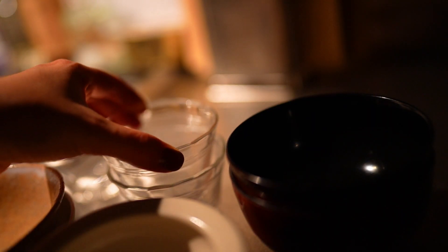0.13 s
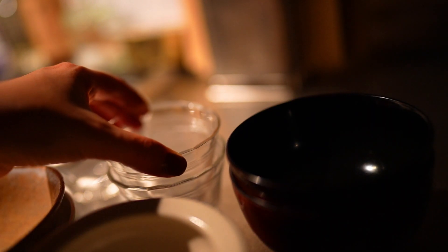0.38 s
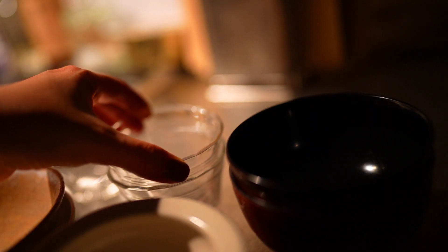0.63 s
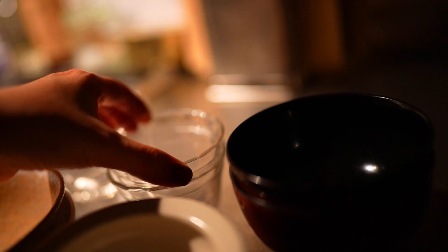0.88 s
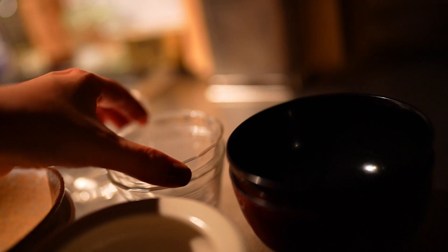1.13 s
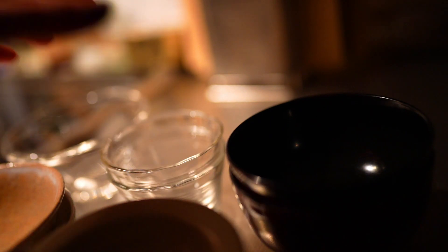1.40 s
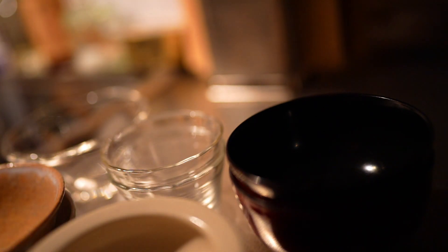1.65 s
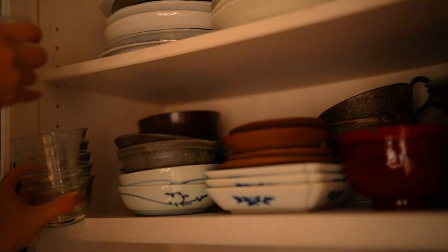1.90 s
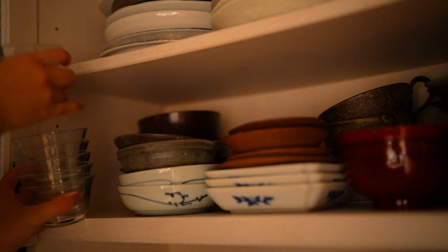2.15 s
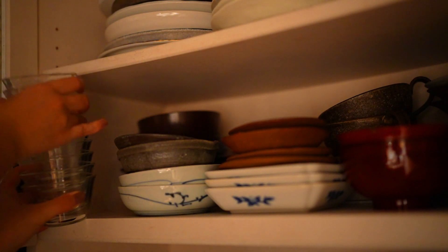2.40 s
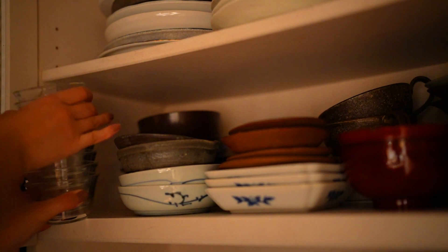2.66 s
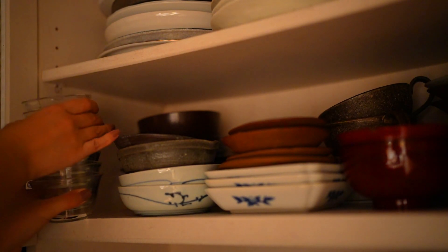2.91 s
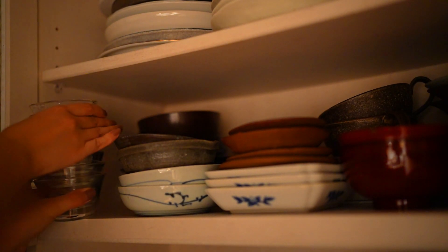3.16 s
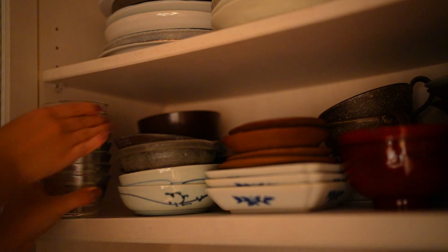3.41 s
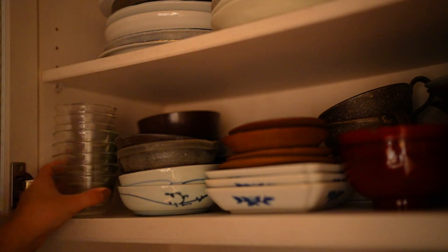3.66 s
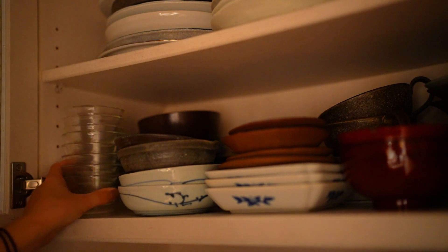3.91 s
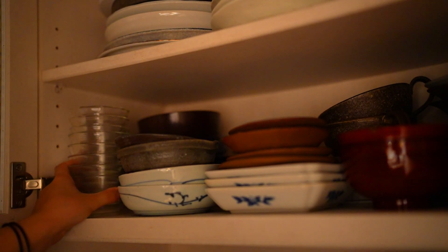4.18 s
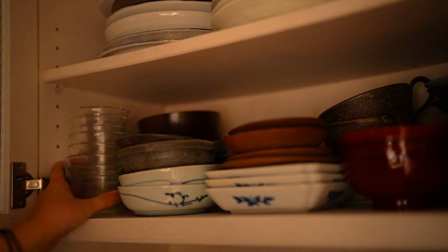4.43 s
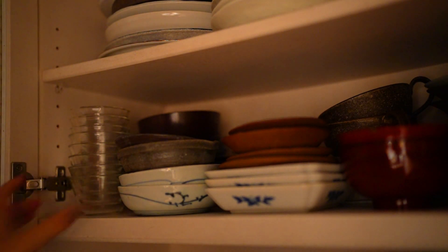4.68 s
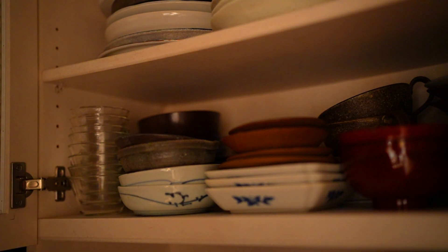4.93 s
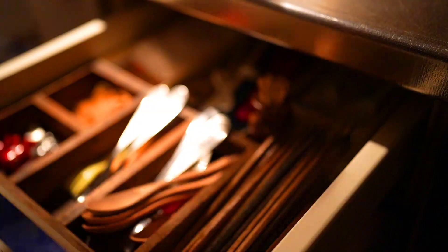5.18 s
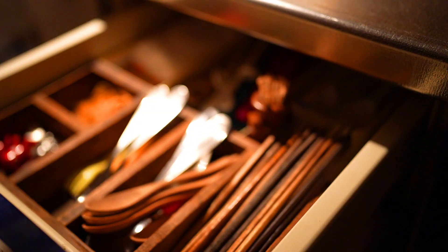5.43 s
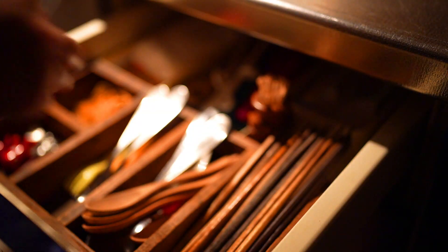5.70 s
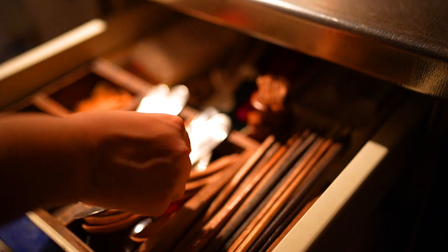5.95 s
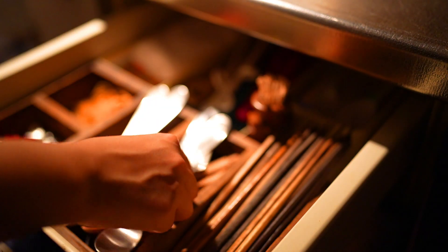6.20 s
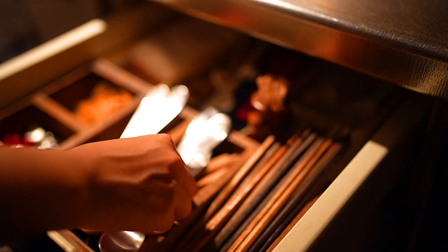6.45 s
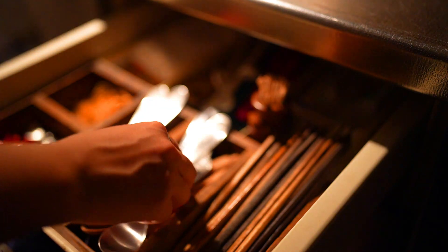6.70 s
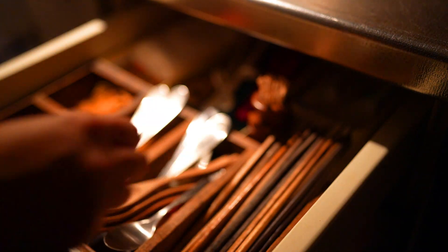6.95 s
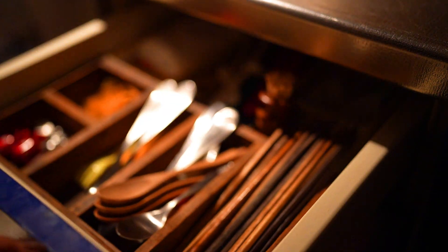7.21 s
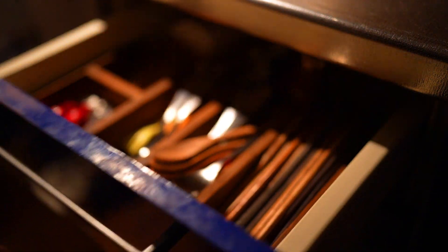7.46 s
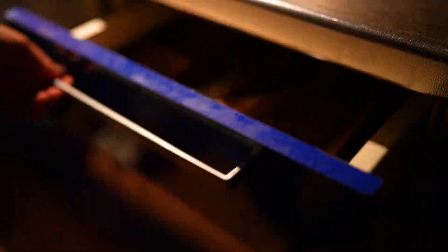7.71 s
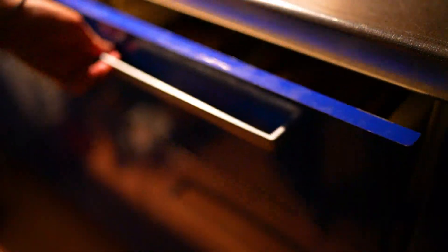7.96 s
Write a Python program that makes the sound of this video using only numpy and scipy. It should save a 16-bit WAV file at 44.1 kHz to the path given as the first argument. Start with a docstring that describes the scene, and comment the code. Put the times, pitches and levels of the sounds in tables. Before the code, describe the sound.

Small glass bowls chatter and clink in a quiet kitchen, get nested on a cupboard stack, then spoons clack and a drawer rolls shut.

```python
"""In a quiet kitchen, small glass bowls chatter as a hand lifts them from a counter, in three places heard in turn.
At a cupboard they are nested on a stack and the stack is slid back; at a drawer a steel spoon is laid among
wooden ones and the drawer rolls shut. Blows are bursts of tiny contacts ringing the modes of each piece;
slides, scrapes and the drawer are snagging noise, some of it fed through modes. Boards boom below the blows,
and each place has its own echo, hum and air, heard by a close pair of microphones."""
import sys
import numpy as np
from scipy import signal
from scipy.fft import rfft, irfft
from scipy.io import wavfile
from scipy.ndimage import uniform_filter1d

SR = 44100
rng = np.random.default_rng(int(sys.argv[2]) if len(sys.argv) > 2 else 0)


def volts_from_decibels(level):
    """Turn decibel levels (scalar or array-like) into linear amplitude factors."""
    exponent = np.asarray(level, float) / 20
    return 10 ** exponent


def unload_audio(sound):
    """Save the sound as a 16-bit wav file, at the path given as the first command line argument."""
    columns = np.transpose(np.atleast_2d(sound))
    # keep every value between -1 and 1, then stretch to whole-number steps
    steps = np.round(np.clip(columns, -1, 1) * 32767)
    wavfile.write(sys.argv[1], SR, steps.astype(np.int16))


N = 356769
T = np.arange(N) / SR
RING = T[:16384]  # time axis of one ringing blow, s
CUPBOARD_END_S = 5.155
# no piece is quite round: each mode is a close pair, up to this share of its pitch apart
SPLIT = 0.0099


def blows(table, modes, chatter_s, first, crack_t60_s, grip_s, focus_db, top_hz, top_db):
    """Each blow is a burst of small contacts that rings the modes and sheds a dense crack.

    first: first touch against the strongest other contact; top_db: lift or cut above top_hz.
    """
    lead_in = 256
    size = len(RING) + 2 * lead_in
    out = np.zeros(N + 2 * len(RING))
    bank = rings(modes)
    mode_hz = np.array(modes)[:, :1]
    bins = (mode_hz[:, 0] * len(RING) / SR).astype(int)
    # while the pieces touch, the same modes are choked into wide bands
    choked = (bank.sum(0) * np.exp(-RING / grip_s))[:1024]
    choked[0] = 0.84 * abs(choked).max()  # and the bare tick of contact comes through
    for s, db, near_hz, treble_db, crack_db in table:
        # the place of contact favours modes near one pitch; harder contact is brighter
        tone = shape([(near_hz / 5, -22), (near_hz / 1.12, -focus_db), (near_hz, 0),
                      (near_hz * 1.21, -focus_db)], size)
        tone += shape([(3500, 0), (6200, treble_db + focus_db)], size)
        tone += shape([(top_hz, 0), (top_hz * 1.07, top_db)], size)

        push = rng.standard_normal(len(RING)) ** 3 * np.exp(-(RING / chatter_s) ** 2)
        push[0] = first * abs(push).max()

        # every mode takes about its own share of energy, however the contacts fall
        received = abs(rfft(push))[bins] + np.sqrt(push @ push) / 2
        share = volts_from_decibels(2 * rng.standard_normal(len(bins))) / received
        beat_hz = mode_hz * SPLIT * rng.random((len(bins), 1))
        turn = rng.random((len(bins), 1)) - 0.5
        pairs = bank * np.cos(np.pi * (beat_hz * RING + turn / 2))
        ring = signal.fftconvolve(share @ pairs, push)[:len(RING)]

        # the crack swells with the energy of the contacts
        energy = signal.fftconvolve(volts_from_decibels(-120 * RING / crack_t60_s), push ** 2)[:len(RING)]
        noise = rng.standard_normal(len(RING)) * np.sqrt(abs(energy))
        crack = signal.fftconvolve(noise, choked)[:len(RING)]

        body = ring / abs(ring).max() + volts_from_decibels(crack_db) * crack / abs(crack).max()
        hit = irfft(rfft(np.pad(body, lead_in)) * volts_from_decibels(tone), size)
        i = int(s * SR)
        out[i:i + size] += volts_from_decibels(db) * hit / abs(hit).max()
    return out[lead_in:N + lead_in]


# Modes of the loose bowls. Each row: pitch in Hz, relative level in dB, t60 in seconds.
LOOSE_BOWL_MODES = [(759, -7.5, 0.15), (863, -4, 0.24), (950, 8, 0.055), (1014, 4.5, 0.078),
                    (1290, -2.5, 0.044), (2092, -3, 0.16), (2256, -4, 0.093), (2650, 2.5, 0.043),
                    (3010, -5.5, 0.067), (3300, -2, 0.041), (3570, -1, 0.026), (4250, -17, 0.087),
                    (4750, -17, 0.086), (5070, 6, 0.055), (5260, -5.5, 0.04), (5950, -15, 0.076),
                    (7400, -19, 0.11), (8560, -9.5, 0.15), (8840, -11, 0.085), (9000, -11, .12),
                    (12800, -30, .1), (13600, -3, 0.082)]
# Bowls rocking under the fingers. Each row: start in seconds, dry peak in dB.
ROCKING_TAPS = [(0.002, -53), (0.084, -47), (0.118, -45), (0.203, -49.5), (0.256, -44.5), (0.301, -50),
                (0.434, -47), (0.482, -49.5), (0.515, -56), (0.541, -29.5), (0.556, -39)]
# Bowls knocking as they are lifted. Each row: start in seconds, dry peak in dB, favoured pitch in Hz,
# treble in dB, crack against ring in dB.
LIFT_BLOWS = [(0.591, -18, 960, 10, -1), (0.604, -19.5, 990, -10, -15), (0.628, -20.5, 5600, -7.5, -14),
              (0.78, -17.5, 2760, -8, -15), (0.794, -22, 870, -3, -21), (0.82, -20, 774, -9, -18),
              (0.829, -22, 1010, -23, -3), (0.845, -17.5, 700, -6, -32), (0.952, -26.5, 2960, -33, -0.5),
              (0.983, -28, 2140, -20, 9)]


def loose_bowls():
    """Loose glass bowls rock against each other under the fingers, then clatter as they are lifted."""
    favoured_hz, treble_db, crack_db = 1030, 0, -24
    taps = [(s, db, favoured_hz, treble_db, crack_db) for s, db in ROCKING_TAPS]
    rocking = blows(taps, LOOSE_BOWL_MODES, chatter_s=0.0076, first=1.25, crack_t60_s=0.049,
                    grip_s=0.0004, focus_db=11.7, top_hz=2700, top_db=-30)
    lifted = blows(LIFT_BLOWS, LOOSE_BOWL_MODES, chatter_s=0.0098, first=1.47, crack_t60_s=0.04,
                   grip_s=0.00046, focus_db=4.9, top_hz=8500, top_db=-15.5)
    return rocking + lifted


# Modes of the nested bowls. Each row: pitch in Hz, relative level in dB, t60 in seconds.
NESTED_BOWL_MODES = [(920, -27, 0.12), (1010, 8.5, 0.12), (1071, -2.5, 0.26), (1518, -7, 0.15),
                     (2217, -6.5, 0.04), (2960, -12, 0.21), (3430, -5.5, 0.15), (3310, -1, 0.048),
                     (3690, -3, 0.08), (4600, -30, 0.11), (5570, -14, 0.21), (5630, -5.5, 0.12),
                     (6140, -8, 0.12), (6470, -14, 0.084), (6950, -19, 0.2), (7200, -15.5, 0.13),
                     (9940, -11, 0.11), (11800, -38, 0.037), (13600, -26, .1), (15100, -7, .1)]
# Bowls nesting into each other. Each row: start in seconds, dry peak in dB, favoured pitch in Hz,
# treble in dB, crack against ring in dB.
NEST_BLOWS = [(2.649, -10.5, 3300, 0.5, -4.5), (2.664, -15.5, 6000, -3, -11), (2.793, -32, 920, -2, 9),
              (2.915, -22.5, 860, 7.5, 7), (3.036, -22, 2960, -3, -2)]


def nested_bowls():
    """Bowls meet as they nest, with a strong first touch and a ring of their own modes."""
    return blows(NEST_BLOWS, NESTED_BOWL_MODES, chatter_s=0.01, first=5.5, crack_t60_s=0.09,
                 grip_s=0.00029, focus_db=1.5, top_hz=10060, top_db=-15.0)


# Modes of the stack. Each row: pitch in Hz, relative level in dB, t60 in seconds.
STACK_MODES = [(816, -24, 0.032), (1174, -7.5, 0.19), (1360, -4, 0.12), (1497, -5, 0.16), (1776, -9, 0.16),
               (2060, -3.5, 0.14), (2390, -8, 0.031), (2615, -3.5, 0.067), (3020, -1.5, 0.052),
               (3170, -8, 0.073), (3600, 5, 0.037), (3984, -25, 0.17), (4830, -8.5, 0.21), (4775, -3, 0.16),
               (5690, 1.5, 0.07), (5580, -4, 0.085), (5680, -13, 0.072), (8250, -2.5, 0.16),
               (8730, -7, 0.048), (10300, -17, 0.091), (12300, -10, .12)]
# Knocks in the stack. Each row: start in seconds, dry peak in dB, favoured pitch in Hz,
# treble in dB, crack against ring in dB.
STACK_BLOWS = [(1.89, -35.5, 1510, -14, -2), (1.948, -40.5, 2060, 2, 3), (2.066, -28, 4600, -15, 0),
               (2.257, -22.5, 1590, -16.5, -2.5), (2.278, -24.5, 3020, -16, 1.5),
               (2.401, -47.5, 676, -37, 5), (2.499, -42.5, 1360, -20, 2), (2.824, -23.5, 1640, -8, 1),
               (3.096, -12.5, 2650, -17, 3.5), (3.238, -43, 641, -12, 15), (3.281, -43, 2390, -30, 0),
               (3.417, -19.5, 1080, -10, -1), (3.438, -23, 950, -12.5, 21), (3.725, -21, 2650, -7.5, 2),
               (3.739, -27.5, 2070, -14, -1), (3.797, -31.5, 4600, -14, -7), (4.177, -19, 816, -1.5, 5)]


def stacked_bowls():
    """The stack of bowls knocks and rings in its own modes."""
    return blows(STACK_BLOWS, STACK_MODES, chatter_s=0.0089, first=2.2, crack_t60_s=0.069,
                 grip_s=0.00029, focus_db=7.5, top_hz=9600, top_db=-3.7)


# Tone of glass sliding on the shelf. Each row: frequency in Hz, gain in dB.
SHELF_TONE = [(59, -26), (100, 2), (252, -9), (329, -18), (445, -9), (786, -10), (1320, -3.5),
              (7000, -18.5), (9100, -36), (15400, -120)]
# The stack pushed over the shelf. Each row: start in seconds, rise in seconds, hold in seconds,
# glass drive in dB, hand drive in dB.
SLIDE_STROKES = [(1.718, 0.14, 0.05, -77, -61.5), (3.43, 0.04, 0.5, -53.5, -62),
                 (4.445, 0.32, 0.25, -60.5, -61.5)]
# Fingers and sleeve brushing past. Each row: start in seconds, drive in dB.
BRUSH_STROKES = [(1.93, -57), (3.8, -61), (4.481, -58), (4.765, -62.5), (4.875, -51.5), (5.1, -49)]


def handling():
    """Glass slides over the shelf board as snagging noise; skin and sleeve hiss."""
    slide_fall_s, brush_rise_s, brush_fall_s = 0.17, 0.016, 0.019
    slide = level(colour(grit(0.89, 90), SHELF_TONE), 1.1)
    skin_tone = [(2500, -8.5), (5000, -1.5), (9000, 1.5), (16000, -3.5)]
    skin = level(colour(grit(2.1, 60), skin_tone), 0.33)
    glass = sum(stroke(s, rise, hold, slide_fall_s, db) for s, rise, hold, db, _ in SLIDE_STROKES)
    hand = sum(stroke(s, rise, hold, slide_fall_s, db) for s, rise, hold, _, db in SLIDE_STROKES)
    hand = hand + sum(stroke(s, brush_rise_s, 0, brush_fall_s, db) for s, db in BRUSH_STROKES)
    return (glass * slide + hand * skin) * (T < CUPBOARD_END_S)


# Resonances of the steel spoon. Each row: pitch in Hz, width in Hz, height in dB.
SPOON_PEAKS = [(2210, 77, 3.5), (3120, 43, 1), (3670, 59, -3), (4470, 135, 2.5), (6000, 52, -3.5),
               (6260, 74, 0), (7600, 52, -25), (8360, 120, -30), (8740, 190, 0), (10790, 52, -2.5),
               (11300, 51, -8), (12600, 52, -8), (14300, 200, -13), (14000, 80, -6)]
# The steel spoon landing. Each row: start in seconds, dry peak in dB, favoured pitch in Hz,
# treble in dB, crack against ring in dB.
STEEL_BLOWS = [(6.173, -35.5, 2650, -14, 6), (6.225, -25, 2680, -7, 9), (6.245, -16, 2830, 3, -14),
               (6.544, -30.5, 2100, 3, -20), (6.62, -25, 8500, -13, -19), (6.726, -13.5, 3670, -6.5, 26),
               (6.773, -25, 2670, -42, 10), (6.799, -43, 2190, -24, 12)]


def steel_spoon():
    """Steel taps its neighbours and rings in its own modes."""
    return blows(STEEL_BLOWS, from_width(SPOON_PEAKS), chatter_s=0.011, first=1.2, crack_t60_s=0.047,
                 grip_s=0.0001, focus_db=3.6, top_hz=14200, top_db=-7)


# Modes of the wooden spoons. Each row: pitch in Hz, relative level in dB, t60 in seconds.
WOODEN_SPOON_MODES = [(770, -32, 0.076), (930, -6, 0.11), (1030, 8, 0.043), (1327, 2, 0.034),
                      (1900, -26, .05), (2170, -4, 0.028), (2650, -19, 0.03), (3780, 0.5, 0.017),
                      (4500, -23, .04), (6520, -5.5, 0.012), (9180, -9, 0.0088), (12460, -1, .01),
                      (15400, -25, .01)]
# Wooden spoons knocking. Each row: start in seconds, dry peak in dB, favoured pitch in Hz,
# treble in dB, crack against ring in dB.
WOOD_BLOWS = [(6.257, -8, 2980, -1.5, 3.5), (6.269, -21.5, 836, -7, 1), (6.848, -11.5, 1130, -60, -3),
              (6.861, -16.5, 1030, -9, -2), (6.902, -39, 950, 8, -19), (6.929, -48, 934, -7, 5),
              (7.11, -38, 2170, -0.5, 6), (7.789, -28, 1150, -13, 6)]


def wooden_spoons():
    """Wooden spoons clack, their modes dying quickly."""
    return blows(WOOD_BLOWS, WOODEN_SPOON_MODES, chatter_s=0.0083, first=1.86, crack_t60_s=0.063,
                 grip_s=0.0001, focus_db=3.2, top_hz=13000, top_db=4.4)


# Steel dragged over its neighbours. Each row: start in seconds, hold in seconds, drive in dB.
STEEL_DRAGS = [(6.415, 0.022, -44.5), (6.531, 0.0031, -42), (6.603, 0.059, -42.5), (6.692, 0.044, -36.5)]
# Wood dragged over its neighbours. Each row: start in seconds, hold in seconds, drive in dB.
WOOD_DRAGS = [(6.174, 0.004, -49), (6.209, 0.0055, -35.5), (6.74, 0.1, -41.5), (6.875, 0.0074, -41),
              (6.95, 0.16, -59)]


def spoons_rubbing():
    """Steel drags over its neighbours and sings in its own modes; wood only rasps."""
    rise_s, steel_fall_s, wood_fall_s = 0.016, 0.018, 0.031
    drive = grit(2.5, 300)
    hiss = level(colour(drive, [(800, -43), (2500, 12.0), (9000, 17.0), (16000, 3)]), -4)
    rasp_tone = [(500, -6.5), (1500, 0.5), (3500, -4.5), (9000, -12.0), (16000, -31)]
    rasp = level(colour(grit(4.4, 400), rasp_tone), 0.24)
    steel = sum(stroke(s, rise_s, hold, steel_fall_s, db) for s, hold, db in STEEL_DRAGS)
    wood = sum(stroke(s, rise_s, hold, wood_fall_s, db) for s, hold, db in WOOD_DRAGS)
    singing = rubbed(drive, from_width(SPOON_PEAKS))
    return steel * (singing + hiss) + wood * rasp


# Cutlery jolted in the drawer. Each row: start in seconds, dry peak in dB, favoured pitch in Hz, treble in dB.
CUTLERY_JOLTS = [(7.313, -33, 3120, -1.5), (7.479, -20.5, 2100, -5.5), (7.679, -34, 4500, -9),
                 (7.729, -30, 4500, -9), (7.765, -31.5, 4500, -12), (7.837, -34, 1760, 8)]


def jolted_cutlery():
    """Steel cutlery is jolted inside the rolling drawer, more crack than ring."""
    crack_db = 8
    jolts = [(*row, crack_db) for row in CUTLERY_JOLTS]
    return blows(jolts, from_width(SPOON_PEAKS), chatter_s=0.01, first=1.8, crack_t60_s=0.059,
                 grip_s=0.0001, focus_db=4.0, top_hz=10800, top_db=-12)


# Resonances of the drawer box. Each row: pitch in Hz, width in Hz, height in dB.
DRAWER_PEAKS = [(90, 21, -5), (183.6, 14.4, -30), (206, 14, 11.5), (249, 18, -2), (334, 75, -2.5),
                (394.6, 26, 4), (474, 57, -13), (535, 150, -8.5), (693, 29, -11)]
# Tone of the runners. Each row: frequency in Hz, gain in dB.
RUNNER_TONE = [(290, -50), (500, -9), (1160, 0), (2460, -7.5), (2840, -13.5), (3270, -10), (3990, -17.5),
               (4540, -14), (5300, -20.5), (15000, -35.5)]
# Push on the drawer. Each row: time in seconds, drive in dB.
DRAWER_PUSH = [(7.01, -59.5), (7.3, -52), (7.41, -39), (7.5, -34.5), (7.62, -37), (7.7, -38.5),
               (7.775, -33.5), (7.86, -38), (7.96, -44), (8.09, -57)]


def drawer():
    """Rollers judder on the runners and shake the wooden box."""
    runner_db, shut_in_db_per_s = -2.5, -7.5
    box = rubbed(grit(2.09, 60), from_width(DRAWER_PEAKS))
    box = colour(box, [(50, -17), (110, -1.7), (800, 1.9), (2000, -12)])
    runner = level(colour(grit(1.6, 150), RUNNER_TONE), runner_db)
    # the runners are shut in as the gap closes
    runner = runner * volts_from_decibels(shut_in_db_per_s * (T - DRAWER_PUSH[1][0]))
    push_db = np.interp(T, *np.transpose(DRAWER_PUSH), left=-150)
    return volts_from_decibels(push_db) * (box + runner)


# Modes of the boards. Each row: pitch in Hz, relative level in dB, t60 in seconds.
BOARD_MODES = [(80, -21, 0.24), (103.4, 5, 0.2), (144.6, 0, 0.5), (183.4, 6.5, 0.23), (246, 0, 0.12),
               (332, 9, 0.06), (478, -2.5, 0.16), (584, 3.5, 0.054), (688, -0.5, 0.091)]
# Boards under a blow. Each row: start in seconds, dry peak in dB, gain of the deep modes in dB.
BOARD_KNOCKS = [(0.592, -57, -12), (0.814, -61, -26), (2.651, -39, -3.5), (3.095, -39, -5), (3.279, -45, 0),
                (3.418, -26, 5), (3.44, -25.5, -11), (3.726, -31.5, -4.5), (3.796, -43.5, -2),
                (4.175, -28, -16), (6.256, -29.5, -33), (6.726, -38, -26), (6.848, -38, -26.5)]


def knocks():
    """Shelf, counter and drawer floor boom in their modes; each knock has its own share of the deeper modes."""
    out = np.zeros(N + len(RING))
    board = rings(BOARD_MODES)
    deep = np.array(BOARD_MODES)[:, 0] < 220  # Hz
    count = len(BOARD_MODES)
    for s, db, deep_db in BOARD_KNOCKS:
        share = volts_from_decibels(deep_db * deep + 2.0 * rng.standard_normal(count)) * rng.choice([-1, 1], count)
        boom = share @ board * (1 - np.exp(-RING / 0.0021))  # soft onset
        i = int(s * SR)
        out[i:i + len(RING)] += volts_from_decibels(db) * boom / abs(boom).max()
    return out[:N]


# Phase between the ports. Each row: frequency in Hz, lead of the left in radians.
LEFT_LEAD = [(150, 0.04), (1000, 0.5), (2500, 1.0), (5000, 1.1), (12000, 1.24)]
# Level between the ports. Each row: frequency in Hz, left minus right in dB.
LEFT_LEAN = [(300, 0), (1300, 1), (2500, 0.4), (5000, -1.5), (12000, -4.5)]


def place(x):
    """One port hears it a little sooner and the recorder's body shades the other, by frequency."""
    half = np.array([[1], [-1]]) / 2
    gain = volts_from_decibels(half * shape(LEFT_LEAN, N))
    phase = np.exp(1j * half * shape(LEFT_LEAD, N))
    return irfft(rfft(x) * gain * phase, N)


def kitchen(x, t60_s, wet_db):
    """Hard walls answer with a short dense tail, alike at both ports in the bass."""
    fade = volts_from_decibels(-60 * RING / t60_s) * (RING > 0.003)
    mid, side = rng.standard_normal((2, len(RING))) * fade
    side = colour(side, [(60, -36), (150, -24), (400, -10), (1000, -4), (2500, 0)])
    tail = colour(mid + side * [[1], [-1]],
                  [(100, -6.5), (300, -1), (1000, -5.0), (5000, -6.5), (16000, -1.0)])
    tail = tail * volts_from_decibels(wet_db) / np.sqrt((mid ** 2).sum())
    return signal.fftconvolve(x[None], tail, axes=1)[:, :N]


# The three places. Each row: start in seconds, end in seconds, air level in dB,
# then peak levels in dB of the third, fifth, seventh and ninth mains harmonics.
PLACE_LEVELS = [(0, 1.72, -54, -56.5, -56, -65, -96), (1.72, 5.155, -51.5, -83, -61, -74, -77),
                (5.155, 8.1, -53.5, -83, -69, -64.5, -65)]
# Tone of the air, one list a place. Each row: frequency in Hz, gain in dB before the common low boom.
AIR_TONES = [
    [(8.8, -63), (15, 5.5), (38, -10.5), (61, -11.5), (146, -8.5), (220, -11), (247, -5), (277, -15),
     (497, -16), (748, -24.5), (2270, -34), (3940, -38), (16000, -37)],
    [(8.8, -33), (15, 0.5), (37, -0.5), (112, -14), (146, -8.5), (220, -20), (247, -13.5), (417, -22),
     (685, -20), (917, -29), (2330, -31.5), (2550, -35), (16000, -38.5)],
    [(8.8, -34), (15, 8), (38, -8.5), (59, -10), (142, -6), (220, -15.5), (247, 3), (286, -18), (455, -11),
     (527, -21.5), (665, -17), (1030, -28), (16000, -36)],
]


def air():
    """Room rumble alike at both ports, unrelated hiss above, odd mains overtones."""
    mains_hz = 50.8
    out = np.zeros((2, N))
    for (start, end, db, *hum_db), tone in zip(PLACE_LEVELS, AIR_TONES):
        mid, side = colour(rng.standard_normal((2, N)), tone)
        mid = colour(mid, [(18, -2.5), (28, 8.5), (42, 0.5)])  # the house booms at one low note
        gain = volts_from_decibels(db) / mid.std()
        side = colour(side, [(30, -48), (125, -17.0), (500, -5.0), (1500, 2.0), (4000, 1.5)])
        hum = sum(volts_from_decibels(h) * np.sin(2 * np.pi * k * mains_hz * T + 6 * rng.random())
                  for k, h in zip((3, 5, 7, 9), hum_db))
        present = 1.0 * ((T >= start) & (T < end))
        present = uniform_filter1d(present, size=400)  # short crossfade between places
        out += present * (gain * (mid + side * [[1], [-1]]) + hum)
    return out


def rings(modes):
    """A struck body rings as one fading sine a mode."""
    hz, db, t60 = np.array(modes).T[:, :, None]
    return volts_from_decibels(db - 60 * RING / t60) * np.sin(2 * np.pi * hz * RING)


def from_width(peaks):
    """(Hz, width, dB) resonances as modes; a wide one needs a bigger swing for the same height."""
    return [(hz, db + 20 * np.log10(width / 100), np.log(1000) / np.pi / width)
            for hz, width, db in peaks]


def grit(spread_db, rate_hz):
    """Friction: noise whose strength jumps at every snag."""
    hold = int(SR / rate_hz)
    snags = np.repeat(rng.standard_normal(N // hold + 1), hold)[:N]
    return level(rng.standard_normal(N) * volts_from_decibels(spread_db * snags), 0)


def rubbed(drive, modes):
    """Friction fed through the modes of a body."""
    return level(signal.fftconvolve(drive, rings(modes).sum(0))[:N], 0)


def stroke(start, rise, hold, fall, db):
    """A movement swells, holds and dies away."""
    swell = np.clip((T - start) / rise, 0, 1) ** 2
    return volts_from_decibels(db) * swell * np.exp(-np.clip(T - start - rise - hold, 0, None) / fall)


def level(x, db):
    """Scale to an rms level in dB."""
    return x * volts_from_decibels(db) / np.sqrt(np.mean(x ** 2))


def shape(points, size):
    """(Hz, value) points read at the bins of a transform, along log frequency."""
    hz, value = np.transpose(points)
    return np.interp(np.log(np.arange(size // 2 + 1) * SR / size + 1), np.log(hz), value)


def colour(x, points):
    """Filter by (Hz, dB) points."""
    size = x.shape[-1]
    return irfft(rfft(x) * volts_from_decibels(shape(points, size)), size)


def scene():
    """Three places in turn, each with its own echo, over the boom of the boards and the air."""
    counter = loose_bowls()
    cupboard = nested_bowls() + stacked_bowls() + handling()
    cutlery = steel_spoon() + jolted_cutlery() + wooden_spoons() + spoons_rubbing() + drawer()
    boom = knocks()
    out = air() + boom + kitchen(boom, 0.39, -1.2)
    rooms = [(0.34, -7), (0.24, -6.0), (0.25, -4.5)]  # (t60 s, wet dB)
    for x, (t60_s, wet_db) in zip((counter, cupboard, cutlery), rooms):
        out += place(x) + kitchen(x, t60_s, wet_db)
    return out


def top_cut(x):
    """Nothing passes above the cut-off."""
    return signal.sosfilt(signal.butter(12, 16800, fs=SR, output="sos"), x)


def record(dry):
    """The finished mix is taken with no change of level or tone of its own."""
    return top_cut(dry)


dry = scene()
out = record(dry)
unload_audio(out)
```